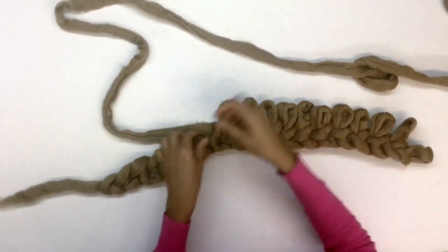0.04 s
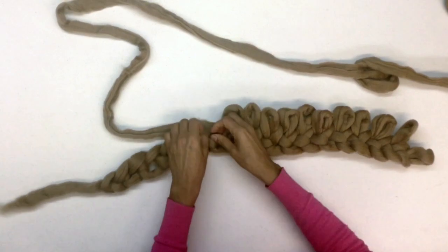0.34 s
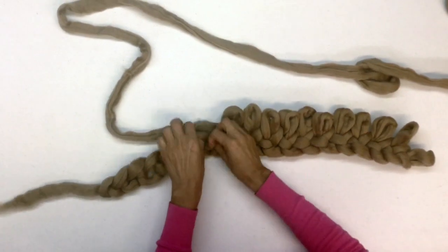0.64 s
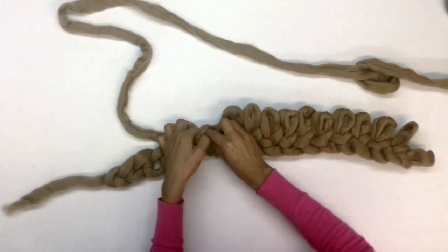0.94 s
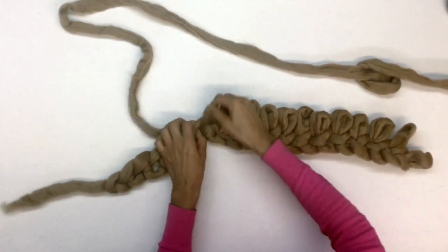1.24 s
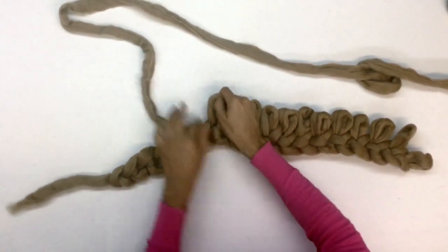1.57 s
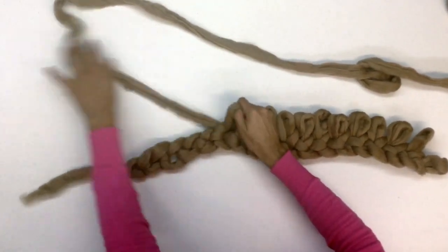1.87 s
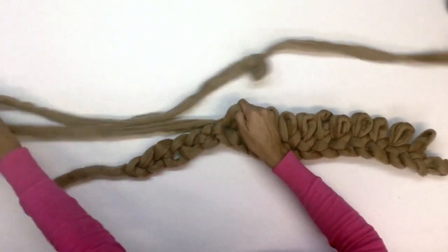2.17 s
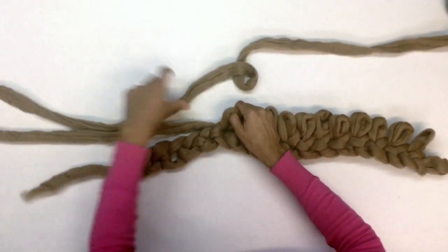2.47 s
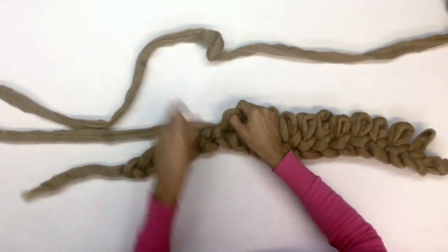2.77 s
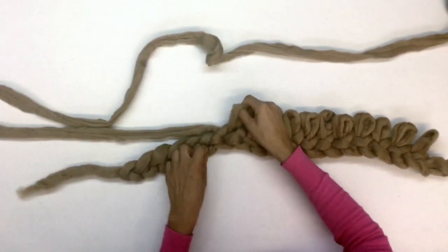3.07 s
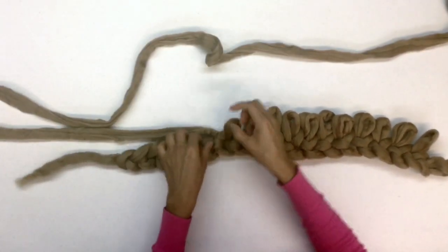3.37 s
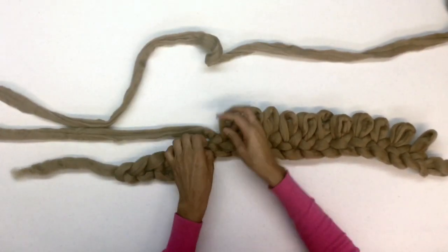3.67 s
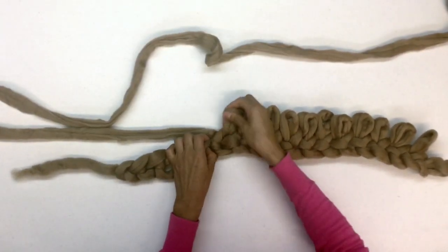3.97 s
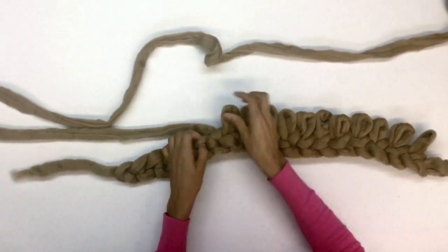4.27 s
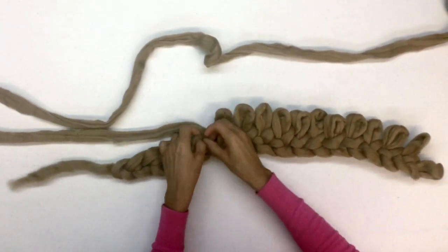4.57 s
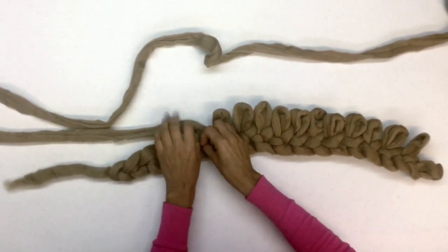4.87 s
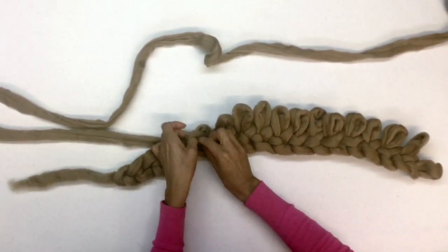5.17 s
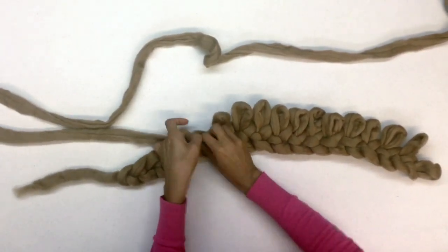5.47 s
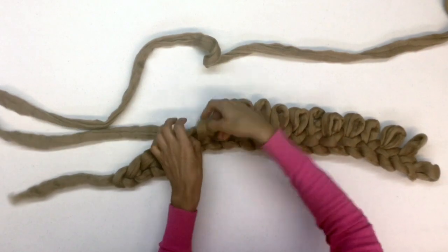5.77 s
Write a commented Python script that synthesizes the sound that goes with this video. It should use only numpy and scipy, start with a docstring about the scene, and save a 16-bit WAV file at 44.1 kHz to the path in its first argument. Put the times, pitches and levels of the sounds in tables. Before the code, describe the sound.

Hands loop thick wool on a tabletop in a small quiet room. The fibres hiss softly in short pulls while sleeves brush and rub the board, and fingers and nails land in scattered light taps. A sharper knock with a soft thud comes about two seconds in, and a quick cluster of clicks near the end. A faint low hum fades partway through. Heard closely from above the table.

```python
"""Chaining wool by hand

Two hands loop thick wool roving into a chain on a tabletop, in a small quiet room.
The fibres hiss as they are pulled, arms and wool rub the board, and fingers, nails and knuckles
tap it and ring its modes. A faint hum, like an engine far outside, sinks slowly in pitch and fades."""
import sys
import numpy as np
from scipy import signal
from scipy.fft import rfft, irfft, next_fast_len
from scipy.io import wavfile
from scipy.ndimage import uniform_filter1d, map_coordinates

SR = 44100
rng = np.random.default_rng(int(sys.argv[2]) if len(sys.argv) > 2 else 0)


def unload_wav(signal):
    """Save mono or channel-first audio to the path in sys.argv[1] as 16-bit WAV at rate SR, clipped to [-1, 1]."""
    wavfile.write(
        sys.argv[1],
        SR,
        np.round(np.clip(np.atleast_2d(signal).T, -1, 1) * 32767).astype(np.int16),
    )


N = 256430
TIME = np.arange(N) / SR


def amp(db):
    """Decibels to gain."""
    return 10 ** (np.asarray(db) / 20)


def unit(x):
    """Scale to rms 1."""
    return x / np.sqrt(np.mean(x ** 2) + 1e-20)


def curves(rows):
    """One value per sample for each column after the time."""
    times, *columns = np.transpose(rows)
    return [np.interp(TIME, times, column) for column in columns]


def wobble(rate):
    """A smooth random curve, rate knots a second."""
    return map_coordinates(rng.standard_normal(int(N * rate / SR) + 4), [TIME * rate])


def filtered(x, response):
    """Pass x through a frequency response."""
    size = next_fast_len(len(x) + 8192)
    return irfft(rfft(x, size) * response(np.fft.rfftfreq(size, 1 / SR)), size)[:len(x)]


def coloured(x, points):
    """x shaped by (Hz, dB) points on a log axis, at rms 1."""
    f, db = np.transpose(points)
    return unit(filtered(x, lambda hz: amp(np.interp(np.log(hz + 1), np.log(f + 1), db, right=-120))))


def noise(colour):
    """Steady noise of a given colour, at rms 1."""
    return coloured(rng.standard_normal(N), colour)


def grains(per_s):
    """Randomly timed impulses of random size."""
    return (rng.random(N) < per_s / SR) * rng.standard_normal(N)


def band(x, lo_hz, hi_hz):
    """Causal band-pass."""
    sos = signal.butter(3, [lo_hz, min(hi_hz, .45 * SR)], "band", fs=SR, output="sos")
    return signal.sosfilt(sos, x)


def resonate(force, modes):
    """A force through (Hz, width Hz, dB) resonances of alternating polarity."""
    return filtered(force, lambda f: sum(
        (-1) ** k * amp(db) * 1j * f * width / (hz * hz - f * f + 1j * f * width)
        for k, (hz, width, db) in enumerate(modes)))


def add(track, s, sound):
    """Mix a sound into the track at time s."""
    part = track[max(round(s * SR), 0):][:len(sound)]
    part += sound[:len(part)]


def strokes(rows, rise_share=0.43, end_drop_db=10.5, flatness=1.57):
    """Gain of (peak s, length s, dB) strokes: the hand speeds up quickly and slows more gently."""
    power = np.zeros(N)
    for s, length, db in rows:
        from_peak = abs(TIME - s) / (length * np.where(TIME < s, rise_share, 1 - rise_share))
        power += amp(db - end_drop_db * from_peak ** flatness) ** 2
    return np.sqrt(power)


def scatter(t60, direct_db, room_db, room_t60):
    """A blow: the first sharp contact, its scatter in the board, then the room's longer tail."""
    t = np.arange(SR // 2) / SR
    direct = amp(direct_db - 60 * t / 0.016)
    spread = amp(-60 * t / t60)
    tail = amp(room_db - 60 * t / room_t60)
    return rng.standard_normal(len(t)) * np.sqrt(direct ** 2 + spread ** 2 + tail ** 2)


def strike(x, db):
    """Set the level of the loudest 30 ms of a blow."""
    power = uniform_filter1d(x ** 2, round(.03 * SR), mode="constant")
    return amp(db) * x / np.sqrt(power.max())


# The two colours of the room tone. Each row: frequency in Hz, relative level in dB.
AIR_COLOUR = [(15, -51), (25, -18), (210, -9.5), (282, -6.5), (483, -32), (1180, -30.5), (1380, -41),
              (1910, -32), (2370, -31), (2570, -33.5), (3180, -31), (3640, -32), (7330, -36),
              (11900, -34.5), (15600, -39)]
BOOM_COLOUR = [(25, -20), (40, -7), (62, 10), (90, 0), (120, 6.5), (170, -31)]
def room():
    """Still air over a low, gently wavering boom."""
    air = amp(-64) * noise(AIR_COLOUR)
    boom = amp(-59.5 + 0.75 * wobble(3.66)) * noise(BOOM_COLOUR)
    return air + boom


# The hum's sinking pitch. Each row: time in seconds, firing rate in Hz.
FIRING_RATE = [(0, 64.5), (1.6, 62.6), (3.3, 61.7), (5.81, 59.5)]
# Its swells and fade. Each row: time in seconds, swell in dB.
HUM_SWELL = [(0, -7.5), (0.6, 6.5), (1.2, -1.5), (1.65, 8.5), (2.3, -1.5), (3.4, -3.5), (3.85, 6),
             (4.2, -21), (5.81, -18)]
# Its harmonics. Each row: multiple of the firing rate, level in dB, dB gained per dB of swell.
HUM_ORDERS = [(1, -75, 2.5), (2, -60.5, 1.5), (3, -71, 0), (4, -61.5, 0.34), (5, -63.5, 1.36), (6, -74, 1),
              (9, -79.5, 1.5)]
def engine():
    """Only the low orders of the far engine come through the walls."""
    rate_hz, = curves(FIRING_RATE)
    swell_db, = curves(HUM_SWELL)
    phase = 2 * np.pi * np.cumsum(rate_hz) / SR
    out = np.zeros(N)
    for order, db, growth in HUM_ORDERS:
        level = amp(db + growth * swell_db + 1.5 * wobble(4))
        out += level * np.sin(order * phase + .3 * wobble(5))
    return out


# Hands and sleeves sliding on the board. Each row: time in seconds, relative level in dB.
RUB_LEVEL = [(0.0, -60), (0.45, -55), (1.37, -56), (1.58, -52.5), (1.89, -49), (2.14, -53), (2.61, -55.5),
             (3.2, -61), (3.61, -54.5), (3.77, -51.5), (4.03, -64.5), (4.48, -65), (4.66, -68.5),
             (5.1, -57.5), (5.53, -59), (5.81, -48.5)]
# The roving dragged across it. Each row: peak time in seconds, length in seconds, level in dB.
ROVING_DRAGS = [(0.16, 0.19, -69), (0.48, 0.43, -63.5), (1.65, 0.38, -67.5), (2.29, 0.14, -63.5),
                (3.08, 0.32, -67), (4.91, 0.069, -63.5)]
# The dark rumble and the dry scuff. Each row: frequency in Hz, relative level in dB.
RUMBLE_COLOUR = [(60, -31), (85, 2), (105, -5.5), (122, -7.5), (146, -8.5), (178, 5.5), (200, -1.5),
                 (228, -0.5), (275, -11.5), (318, -7.5), (350, -21.5), (410, -17), (490, -26.5), (700, -44)]
SCUFF_COLOUR = [(250, -3.5), (450, 3), (700, 2), (1100, -5), (1600, -5.5), (2200, -13), (3200, -30),
                (7000, -52)]
def sliding():
    """Arms drag unevenly over the board, which rumbles under the scuff of cloth and roving."""
    rub_db, = curves(RUB_LEVEL)
    rumble = amp(rub_db + 1.5 + 1.85 * wobble(25)) * noise(RUMBLE_COLOUR)
    cloth_db = -69.5 + 0.15 * (rub_db - rub_db.mean())
    drag = np.hypot(amp(cloth_db), strokes(ROVING_DRAGS))
    scuff = drag * amp(1.3 * wobble(30)) * noise(SCUFF_COLOUR)
    return rumble + scuff


# A sleeve brushing past. Each row: peak time in seconds, length in seconds, level in dB.
SLEEVE_BRUSHES = [(0.38, 0.12, -69.5), (0.98, 0.17, -64.5), (1.76, 0.17, -69), (1.93, 0.072, -56),
                  (3.07, 0.098, -67), (3.24, 0.096, -70.5), (4.31, 0.08, -70.5), (4.9, 0.07, -62.5),
                  (5.8, 0.058, -62.5)]
# The soft brush of fabric. Each row: frequency in Hz, relative level in dB.
CLOTH_COLOUR = [(1500, -15), (2500, 0), (3200, 1.5), (4200, 2.5), (5200, -4.5), (6200, -19), (8000, -40)]
def sleeves(rest_db=-81):
    """Cloth rustles faintly throughout and swells as a sleeve brushes past."""
    motion = np.hypot(amp(rest_db), strokes(SLEEVE_BRUSHES))
    return motion * amp(2.6 * wobble(35)) * noise(CLOTH_COLOUR)


# Wool pulled through the loops. Each row: peak time in seconds, length in seconds, hiss level in dB.
WOOL_PULLS = [(0.25, 0.066, -69), (0.42, 0.64, -65), (0.78, 0.05, -68.5), (0.86, 0.1, -64.5),
              (0.97, 0.11, -64.5), (1.06, 0.14, -58.5), (1.25, 0.19, -55.5), (1.37, 0.14, -63.5),
              (1.525, 0.16, -59), (1.64, 0.1, -69), (1.88, 0.14, -50.5), (2.12, 0.23, -63),
              (2.662, 0.046, -56), (3.07, 0.11, -64), (3.245, 0.24, -68.5), (3.53, 0.1, -69),
              (3.66, 0.41, -69.5), (4.05, 0.13, -66.5), (4.235, 0.049, -66), (4.38, 0.53, -73.5),
              (4.625, 0.13, -61.5), (4.79, 0.34, -68), (5.13, 0.066, -46), (5.3, 0.29, -69.5),
              (5.48, 0.1, -57), (5.6, 0.21, -65), (5.74, 0.18, -60.5)]
# The bright hiss of the fibres. Each row: frequency in Hz, relative level in dB.
FIBRE_COLOUR = [(1500, -8.5), (2500, -12), (3800, -5.5), (5200, -8.5), (6200, -15), (8500, -13.5),
                (9400, -8.5), (11500, -4), (12800, -1), (13600, -4.5), (14400, -6.5), (15700, -15)]
def wool(rest_db=-84):
    """Countless fibres slip past each other: a fine hiss with tiny snags over a softer brush."""
    pull = np.hypot(strokes(WOOL_PULLS), amp(rest_db))
    snags = unit(grains(per_s=220))
    slips = rng.standard_normal(N) + 0.5 * snags
    hiss = amp(1.3 * wobble(45)) * coloured(slips, FIBRE_COLOUR)
    brush = amp(-10.5 + 1.9 * wobble(35)) * noise(CLOTH_COLOUR)
    return pull * (hiss + brush)


# Single fibres breaking. Each row: start in seconds, level in dB before the trim.
FIBRE_SNAPS = [(0.1351, -67), (0.3925, -68), (0.8604, -70), (1.834, -43), (2.639, -48), (3.935, -59)]
def snaps(trim_db=-14):
    """Now and then a fibre snaps with a tiny, very high tick."""
    out = np.zeros(N)
    for s, db in FIBRE_SNAPS:
        burst = scatter(t60=.04, direct_db=6, room_db=-20, room_t60=.2)
        add(out, s, strike(band(burst, 9200, 15500), db + trim_db))
    return out


# Hits on the tabletop. Each row: start in seconds, strength in dB, flesh accent in dB,
# nail accent in dB, click pitch in Hz, landing time in seconds.
FINGER_TAPS = [(0.2378, -52.5, 12.5, 9, 3000, 0.00043), (0.5604, -55.5, 9, -1.5, 3200, 0.0012),
               (0.7293, -49, 4, 5, 3110, 0.0013), (0.9216, -44, 6.5, 6.5, 3140, 0.0018),
               (1.0948, -38.5, -9, -5, 3140, 0.0014), (1.1118, -45.5, -3, 0, 2800, 0.002),
               (1.4755, -58, -6, 6, 3270, 0.0013), (1.833, -30.5, -1.5, 4.5, 3470, 0.00061),
               (1.8556, -48, 3, 16, 3240, 0.0041), (1.8762, -57, 12, 21, 3380, 0.0065),
               (1.9214, -58, -5, 17.5, 3130, 0.007), (2.6373, -45, 3, 6, 3335, 0.00074),
               (3.558, -48.5, 6, 8, 3040, 0.0017), (3.932, -53, 0, 8, 3240, 0.003),
               (4.7483, -45.5, -7, 1, 2700, 0.0021), (4.7995, -47.5, -7.5, -3, 2870, 0.0014),
               (4.8824, -54.5, 4, 0, 3100, 0.0046), (4.926, -58, 0, 6, 2500, 0.0027),
               (5.0385, -55.5, -18, 3.5, 2770, 0.0024), (5.1044, -37, 3, 7, 3250, 0.0081),
               (5.121, -28, -10.5, 3.5, 3240, 0.00087), (5.1338, -27, -12.5, -4, 2830, 0.0011),
               (5.17, -50.5, 11, 5, 2980, 0.0049), (5.6297, -72, 16, 14, 3190, 0.0016)]
# What a hit rings: the board, the click's side modes, the edge of a hard contact, crushed fibres.
# Each row: frequency in Hz, width in Hz, relative level in dB.
BOARD_MODES = [(63.5, 44, 0.5), (120.2, 24.5, -1), (165.8, 16.4, 3), (242, 22, -13), (276, 23, 2.5),
               (317.4, 32, 12), (405, 80, -9), (533.6, 33.4, -1), (630, 90, -9), (827, 104, -7.5),
               (956, 37, -8), (1045, 70, -9), (1198, 36, -14), (1273, 32, -7), (1441, 23, -5.5),
               (1550, 145, -15.5), (1736, 33, -8), (1910, 270, -18)]
CLICK_MODES = [(2540, 130, -12.5), (3360, 420, -8)]
EDGE_MODES = [(3845, 250, 0), (4890, 230, -5.5), (5290, 240, -4)]
PUFF_MODES = [(6800, 2000, -6.5), (9400, 670, -1), (11800, 2500, -4)]
def taps(ping_t60=0.055, ping_loss_db_per_s=6000):
    """Flesh thuds, knuckles knock and nails click on the board; the wool beneath puffs out hiss."""
    out, t = np.zeros(N), np.arange(SR // 2) / SR
    for s, db, flesh_db, nail_accent_db, click_hz, land_s in FINGER_TAPS:
        landing = 1 - np.exp(-t / land_s)
        flesh = landing * scatter(t60=0.17, direct_db=13.5, room_db=-8.5, room_t60=0.32)
        ring = resonate(flesh, BOARD_MODES)
        thud = strike(band(ring, 43, 182), db + flesh_db - 4.5)
        body = strike(band(ring, 201, 446), db + 0.67 * flesh_db - 1)

        knuckle = landing * scatter(t60=0.13, direct_db=6.5, room_db=-12, room_t60=0.29)
        knock = strike(band(resonate(knuckle, BOARD_MODES), 434, 2320), db - 8)

        nail = landing * scatter(t60=0.063, direct_db=4, room_db=-7, room_t60=0.25)
        nail_db = db + nail_accent_db
        # The click's main ring depends on where and how the nail lands.
        nail_ring = resonate(nail, [(click_hz, 170, 0)] + CLICK_MODES)
        click = strike(band(nail_ring, 2060, 5000), nail_db - 14)
        # A slower landing leaves less of the clean ping.
        tone = landing * amp(-60 * t / ping_t60) * np.sin(2 * np.pi * click_hz * t)
        ping = strike(tone, nail_db - 13.5 - ping_loss_db_per_s * land_s)
        edge = strike(band(resonate(nail, EDGE_MODES), 2900, 5570), nail_db - 21)
        puff = strike(band(resonate(nail, PUFF_MODES), 7100, 21000), nail_db - 29)
        add(out, s, thud + body + knock + click + ping + edge + puff)
    return out


# Soft presses of the palm. Each row: start in seconds, level in dB before the trim.
PALM_PRESSES = [(0.768, -40), (0.854, -40.5), (1.6, -44), (1.87, -29), (1.92, -38), (3.626, -38.5),
                (3.697, -38.5), (3.77, -44), (5.2, -45)]
def presses(trim_db=-6):
    """A soft palm moves only the board's lowest modes."""
    out = np.zeros(N)
    for s, db in PALM_PRESSES:
        push = scatter(t60=0.072, direct_db=-7, room_db=-12.5, room_t60=0.42)
        add(out, s, strike(band(resonate(push, BOARD_MODES), 64, 153), db + trim_db))
    return out


# A fingernail dragged over the board. Each row: peak time in seconds, length in seconds, level in dB.
NAIL_SCRAPES = [(3.08, 0.13, -68.5), (3.68, 0.39, -64.5), (4.9, 0.1, -70), (5.075, 0.11, -60.5)]
# The scrape's resonances. Each row: frequency in Hz, width in Hz, relative level in dB.
SCRAPE_MODES = [(1050, 108, 3), (1520, 140, 3), (2820, 260, -8), (3050, 130, -1.5), (3160, 550, -5)]
def scrape():
    """The nail sticks and slips in quick grains that ring its resonances."""
    return strokes(NAIL_SCRAPES) * unit(resonate(grains(per_s=1500), SCRAPE_MODES))


def walls(x, echo_db, count=10):
    """Near walls return weak copies within 30 ms, which comb the upper range."""
    out, bright = x.copy(), band(x, 410, 15000)
    for distance, size in rng.random((count, 2)):
        gain = amp(echo_db - 14.2 * distance) * (0.91 + 0.72 * size)
        add(out, 0.0028 + 0.023 * distance, gain * bright)
    return out


def scene():
    """The handwork and its echoes over room tone and hum, heard in mono from above the table."""
    hands = sliding() + sleeves() + wool() + snaps() + taps() + presses() + scrape()
    return (room() + engine() + walls(hands, echo_db=-17))[None]


def record(dry, top_hz=15720):
    """A brick-wall low-pass takes off the very top."""
    return np.array([filtered(x, lambda hz: hz < top_hz) for x in dry])


dry = scene()
out = record(dry)
unload_wav(out)
```